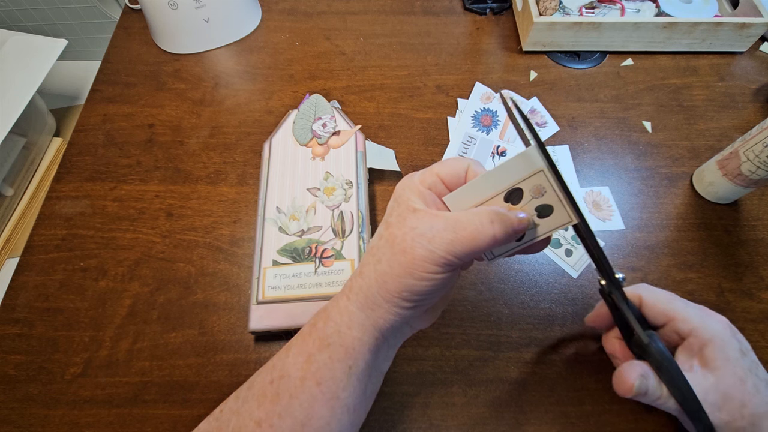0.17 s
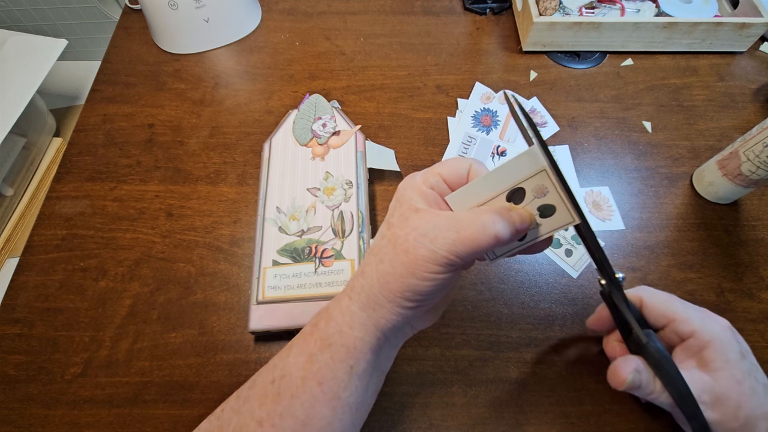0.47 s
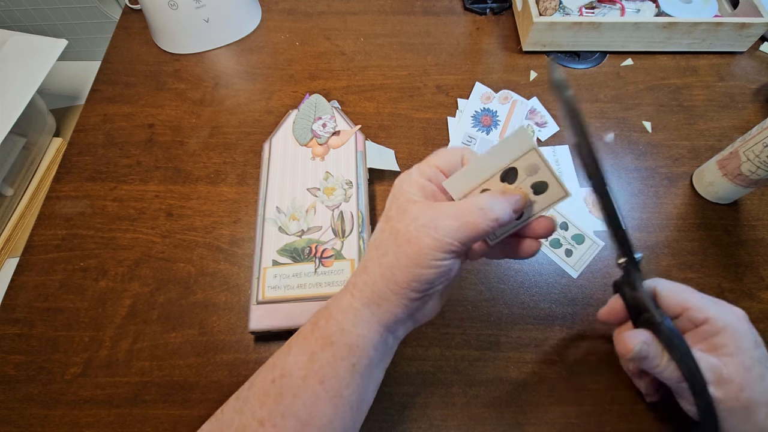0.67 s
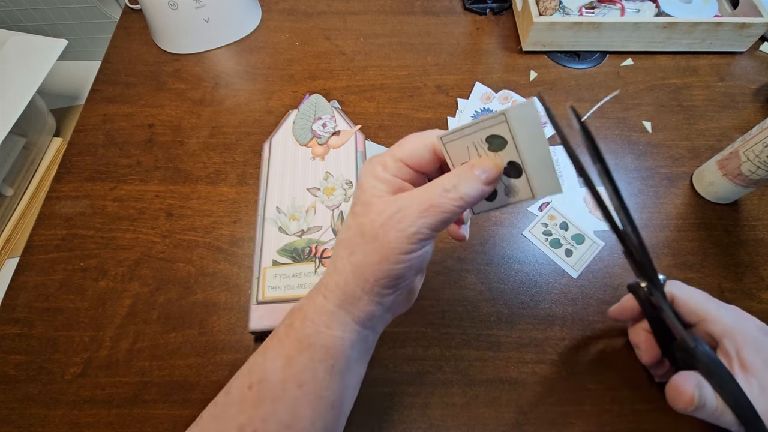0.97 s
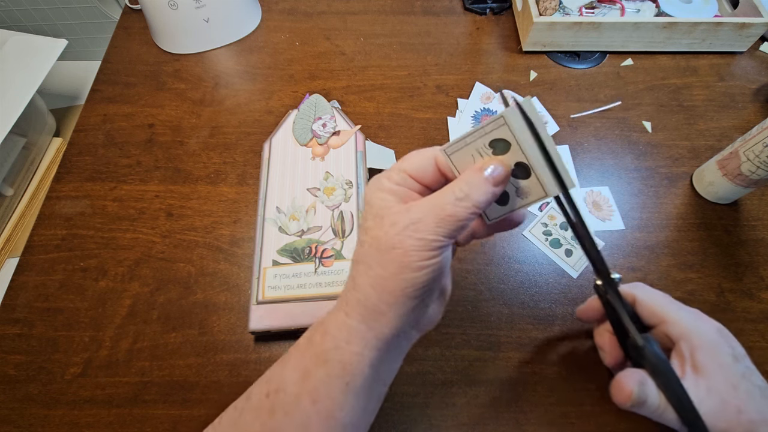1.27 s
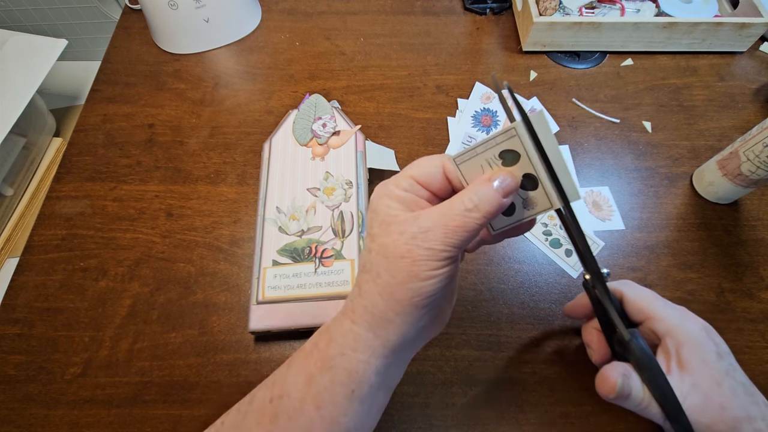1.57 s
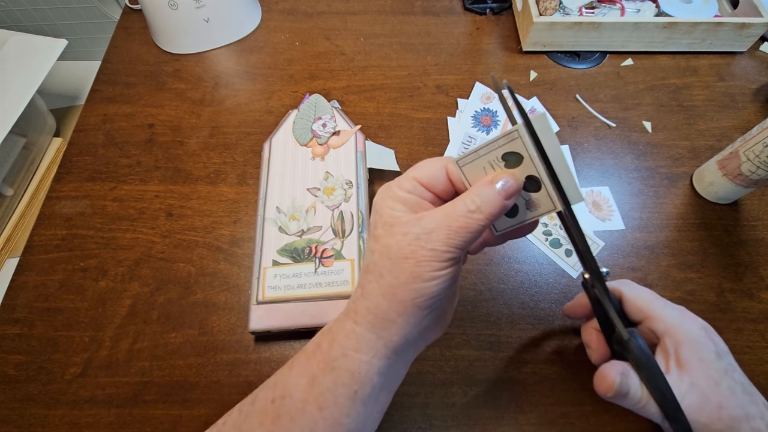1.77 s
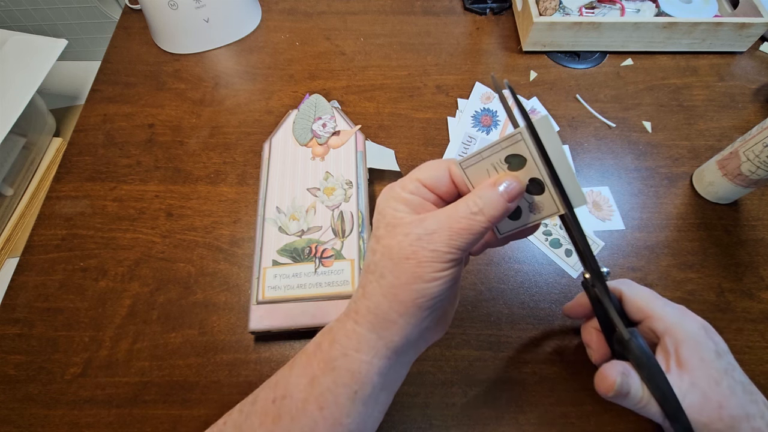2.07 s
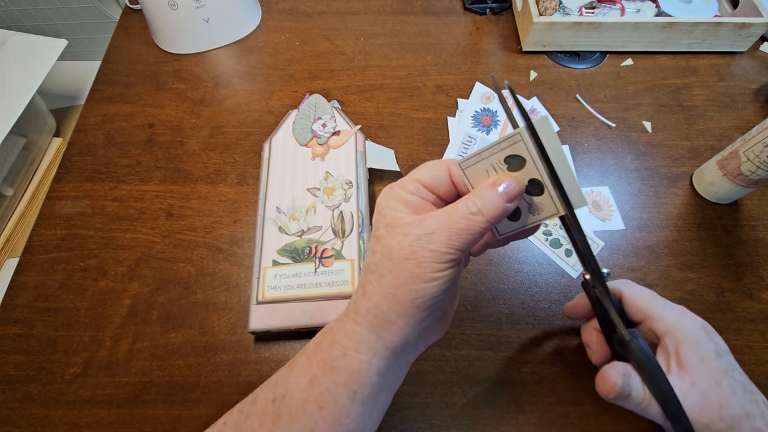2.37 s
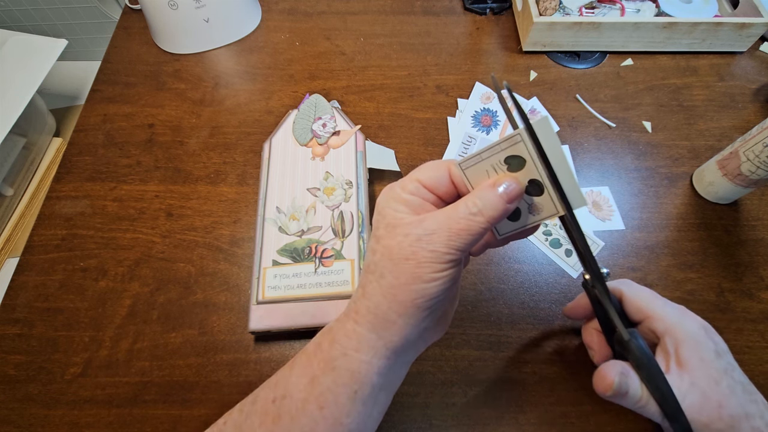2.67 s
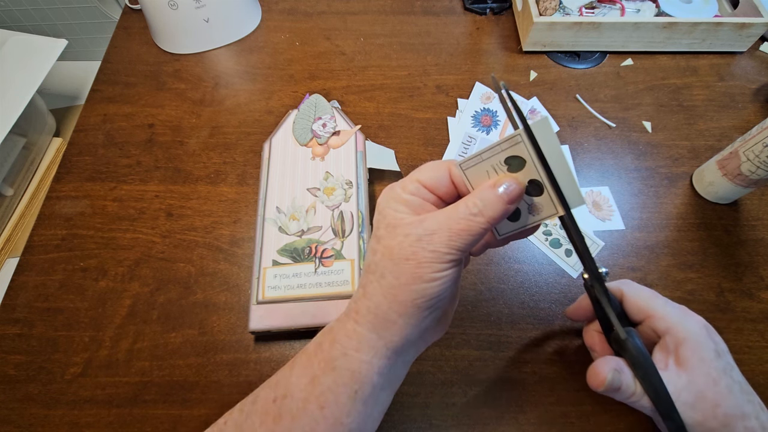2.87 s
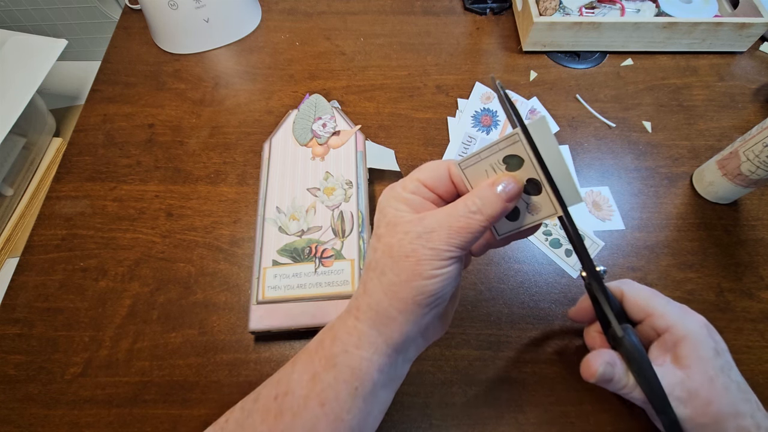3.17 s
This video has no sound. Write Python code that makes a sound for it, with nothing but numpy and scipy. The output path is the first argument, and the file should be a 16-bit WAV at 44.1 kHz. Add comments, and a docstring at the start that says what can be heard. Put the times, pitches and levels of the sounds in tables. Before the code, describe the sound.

Scissors cut card, close and slightly left in stereo, in a small quiet room with soft low rumble and faint hum. From 0 s dry crackling bites quicken and grow, loudest around 0.53-0.58 s, ending in a metallic snap. Blades rub open at 0.7-1.0 s, with a low thump at 0.81 and click at 0.85. Barely audible handling and ticks follow; from 2.8 s a slow, quieter cut crackles until the end.

```python
"""Scissors trimming card

Large scissors above a wooden desk in a quiet room, heard close and in stereo, a little to the left.
The blades bite through the fibres in crackling bursts that ring the card, quicken and grow until they snap shut.
They slide open with a grainy rub, a thump and a click while the card is turned; light handling and faint ticks
fill the pause, then a second, slow cut begins. Filtered noise and wavering sines make the room's rumble and hum."""
import sys
import numpy as np
from scipy import signal
from scipy.fft import rfft, irfft
from scipy.io import wavfile

SR = 44100
rng = np.random.default_rng(int(sys.argv[2]) if len(sys.argv) > 2 else 0)


def unload_audio(sound):
    """Save the sound as a 16-bit wav file, at the path given as the first command line argument."""
    columns = np.transpose(np.atleast_2d(sound))
    # keep every value between -1 and 1, then stretch to whole-number steps
    steps = np.round(np.clip(columns, -1, 1) * 32767)
    wavfile.write(sys.argv[1], SR, steps.astype(np.int16))


N = 145530
TIME = np.arange(N) / SR


def from_db(db):
    """Decibels to gain."""
    return 10 ** (np.asarray(db) / 20)


def rms_one(x):
    """Scale to unit rms."""
    return x / np.sqrt(np.mean(x ** 2) + 1e-20)


def colour(x, points, keep_level=True, size=8192):
    """Minimum-phase filter through (f/Hz, level/dB) points; by default white noise keeps its level."""
    hz, db = np.transpose(points)
    bin_hz = np.arange(size // 2 + 1) * SR / size
    gain = from_db(np.interp(np.log(bin_hz + 1), np.log(hz), db))
    # folding the cepstrum forward makes the filter causal
    cepstrum = irfft(np.log(rms_one(gain) if keep_level else gain))
    cepstrum[1:size // 2] *= 2
    cepstrum[size // 2 + 1:] = 0
    response = irfft(np.exp(rfft(cepstrum)))
    return signal.fftconvolve(np.atleast_2d(x), response[None], axes=1)[:, :N]


# stereo spread of the scissors, side relative to mid: f/Hz, level/dB
WIDTH = [(150, -13), (400, -15), (1000, -12.5), (2500, -7), (5000, -3), (9000, 1.5), (16000, -1)]


def stereo(pair, width=WIDTH):
    """Two unrelated signals become mid and side, with the side filtered by the width curve."""
    side = colour(pair[1], width, keep_level=False)[0]
    return np.array([pair[0] + side, pair[0] - side])


def stereo_noise(width=WIDTH):
    """White noise spread over the stereo pair."""
    return stereo(rng.standard_normal((2, N)), width)


def grains(per_s, spread_db):
    """Stereo stream of tiny clicks of uneven size and either sign, rms 1 before spreading."""
    uneven_db = spread_db * np.minimum(rng.exponential(1, (2, N)), 4)
    sizes = from_db(uneven_db) * rng.choice([-1, 1], (2, N))
    present = rng.random((2, N)) < per_s / SR
    return stereo(rms_one(sizes * present))


def ring(x, hz, t60):
    """A unit click sets a decaying sine ringing from height 1."""
    r, w = np.exp(-np.log(1000) / (t60 * SR)), 2 * np.pi * hz / SR
    return signal.lfilter([0, np.sin(w)], [1, -2 * r * np.cos(w), r * r], x + 1e-18)


def resonance(x, hz, width):
    """Band resonance with a gain of about 1 on top."""
    r = np.exp(-np.pi * width / SR)
    poles = [1, -2 * r * np.cos(2 * np.pi * hz / SR), r * r]
    return signal.lfilter(np.array([1, 0, -1]) * (1 - r * r) / 2, poles, x + 1e-18)


def wander(per_s):
    """Random values joined by straight lines, so many a second."""
    return np.interp(TIME * per_s, np.arange(N), rng.standard_normal(N))


# low room rumble, relative spectrum: f/Hz, level/dB
RUMBLE = [(15, -18), (30, -1.5), (45, -2), (62, 5.5), (78, -4.5), (98, -23), (160, -33), (400, -60.5),
          (2000, -100)]
# rumble level through the take: t/s, level/dB
RUMBLE_LEVEL = [(0, -42.5), (.35, -47), (.9, -46.5), (1.5, -42.5), (1.8, -45), (2.4, -41), (2.7, -42),
                (2.85, -48), (3.3, -46)]
# soft air of the room, relative spectrum: f/Hz, level/dB
AIR = [(40, 16), (100, 24.5), (150, 29.5), (205, 19), (300, 17.5), (450, 4.5), (800, -1.5), (1300, -2),
       (1900, -11.5), (3500, -16.5), (4500, -16), (6000, -26.5), (8700, -33), (9800, -59.5), (16000, -42)]
# mains hum and a thin whine: f/Hz, level/dB rms before wavering
HUM = [(119.6, -61.5), (176.2, -62.5), (2160, -84), (4430, -100.5)]
# stereo spread of the diffuse background, side relative to mid: f/Hz, level/dB
BACKGROUND_WIDTH = [(60, -31), (150, -11), (300, -8), (700, 1), (2000, 2.5), (8000, -2)]
AIR_DB, HUM_WAVER = -61, 0.2
RUMBLE_WANDER_DB, RUMBLE_WANDERS_PER_S = 2.5, 11


def background():
    """Low rumble and soft air as filtered noise, with hum as sines wavering slightly in level and phase."""
    rumble_db = np.interp(TIME, *np.transpose(RUMBLE_LEVEL))
    rumble_db = rumble_db + RUMBLE_WANDER_DB * wander(RUMBLE_WANDERS_PER_S)
    rumble = from_db(rumble_db) * colour(stereo_noise(BACKGROUND_WIDTH), RUMBLE)
    air = from_db(AIR_DB) * colour(stereo_noise(BACKGROUND_WIDTH), AIR)
    knots = np.linspace(0, TIME[-1], num=20)
    hum = 0
    for hz, db in HUM:
        wavers = HUM_WAVER * rng.standard_normal((2, len(knots)))
        swell, drift = (np.interp(TIME, knots, waver) for waver in wavers)
        sine = np.sin(2 * np.pi * hz * TIME + 2 * drift)
        hum = hum + from_db(db) * np.sqrt(2) * (1 + swell) * sine
    return rumble + air + hum


BITE_ATTACK_S, BITE_RELEASE_S = 0.0049, 0.00077
BITE_LEAD_S, BITE_LEAD_DB = 0.0023, -3


def bite_shape(t, length):
    """A faint scrape leads in; the bite swells, holds while the blade advances, and dies."""
    lead = from_db(BITE_LEAD_DB) * np.exp(np.minimum(t, 0) / BITE_LEAD_S)
    swell = np.clip(t / BITE_ATTACK_S + 0.033, 0, 1)
    return np.maximum(lead, swell) * np.exp(-np.maximum(t - length, 0) / BITE_RELEASE_S)


# each bite of the blades: t/s, length/s, fibre crackle level/dB, extra treble level/dB,
# card ring level/dB, card pitch f/Hz, rasp pitch f/Hz
BITES = [ (.000, 0.01, -69, 4, -67, 368, 4060), (0.015, 0.0077, -62, -1.5, -69.5, 402, 4100),
         (.073, 0.0071, -52.5, -2, -65, 1010, 4380), (0.139, 0.00088, -63, 3.5, -78, 430, 4370),
         (0.151, .012, -59, -0.5, -64, 360, 4230), (.226, 0.0074, -43, -9.5, -63, 707, 4330),
         (0.256, 0.004, -59, 7.5, -63.5, 387, 4500), (0.288, 0.0087, -45.5, -8, -66, 430, 5630),
         (.408, 0.0065, -53, -4.5, -65, 406, 5170), (0.416, 0.0093, -49.5, -9.5, -65, 390, 4840),
         (0.434, 0.0059, -52, -8, -69, 1100, 4100), (0.457, 0.01, -53.5, 0.5, -57.5, 722, 4830),
         (.492, 0.0096, -50, -5, -50, 775, 5330), (.525, 0.011, -37, -9, -52, 994, 1630),
         (.544, 0.011, -35, -12.5, -56, 734, 1620), (0.565, 0.0094, -38, -7.5, -66, 1020, 2100),
         (0.58, 0.0061, -53, 2, -49, 1004, 4430), (0.591, 0.016, -49, -1.5, -87, 990, 2840),
         (2.8, 0.0039, -61.5, -6.5, -85, 326, 2930), (2.828, 0.0036, -57, -0.5, -83, 330, 2970),
         (2.854, 0.012, -62, -2, -72, 360, 4740), (2.893, 0.0055, -72, 1, -77, 345, 4400),
         (2.913, 0.011, -63.5, 7, -62.5, 399, 3140), (2.947, 0.0099, -68, 8, -70, 366, 5160),
         (2.979, 0.007, -62, 5.5, -66, 403, 5150), (3.007, 0.0093, -62.5, 2.5, -90, 430, 2750),
         (3.061, 0.005, -66, 9.5, -71.5, 336, 4970), (3.082, 0.016, -56.5, -1.5, -67.5, 303, 5030),
         (3.137, 0.0036, -65, 2, -81, 360, 3970), (3.163, 0.005, -69, 4, -85, 366, 4870),
         (3.179, 0.002, -63, 5, -87, 367, 4800), (3.192, 0.0058, -55.5, -4.5, -74, 385, 4850),
         (3.218, 0.0085, -56.5, -5, -88, 400, 3800), (3.238, 0.0041, -53, -6, -71, 415, 3600),
         (3.247, 0.0058, -52.5, -1, -70, 400, 3530), (3.28, 0.014, -53, -6.5, -65, 364, 4100)]


def bite_envelope(levels_db):
    """All bites in turn, at the given levels."""
    out = np.zeros(N)
    for (start, length, *_), db in zip(BITES, levels_db):
        span = slice(max(int(start * SR) - SR // 20, 0), int(start * SR) + SR // 10)
        out[span] += from_db(db) * bite_shape(TIME[span] - start, length)
    return out


RASP_WIDTH_HZ, RASP_DB = 240, 5.5


def rasps(crackle):
    """Each bite brings out its own narrow band of the crackle."""
    out = np.zeros((2, N))
    for start, length, *_, rasp_hz in BITES:
        end = start + length + 4 * BITE_RELEASE_S
        span = slice(max(int(start * SR), 0), int(end * SR))
        out[:, span] += resonance(crackle[:, span], rasp_hz, RASP_WIDTH_HZ)
    return from_db(RASP_DB) * out


# the card as a sounding board: f/multiple of the bite's card pitch, level/dB relative to its ring
CARD = [(0.998, 0), (1.17, -14.5), (1.58, -18.5), (2.02, -15.5), (2.701, -17)]
CARD_Q, CARD_RING_S = 12, .04


def card_rings(fibres):
    """Each bite shakes the card, which rings at the pitch of the strip still held."""
    out = np.zeros((2, N))
    for start, length, _, _, card_db, pitch, _ in BITES:
        span = slice(max(int(start * SR), 0), int((start + CARD_RING_S) * SR))
        push = fibres[:, span] * bite_shape(TIME[span] - start, length)
        for ratio, db in CARD:
            hz = ratio * pitch
            out[:, span] += from_db(card_db + db) * rms_one(resonance(push, hz, hz / CARD_Q))
    return out


# breaking fibres, relative spectrum: f/Hz, level/dB
CRACKLE = [(250, -8.5), (400, -5), (600, 0.5), (800, -6.5), (1400, -5), (2200, -3.5), (2950, 1),
           (4100, 1.5), (5100, 3.5), (6300, -0.5), (8600, 3), (9900, -17.5), (12000, -1.5), (16000, -12.5)]
FIBRES_PER_S, FIBRE_SPREAD_DB = 7000, 3
TREBLE_FROM_HZ = 1970


def cutting():
    """Fibres break in bursts; they crackle, rasp and set the card ringing."""
    _, _, crackle_db, treble_db, *_ = np.transpose(BITES)
    fibres = grains(FIBRES_PER_S, FIBRE_SPREAD_DB)

    def band(kind):
        """One side of the treble split, filtered twice so that the bands rejoin evenly."""
        sections = signal.butter(2, TREBLE_FROM_HZ, kind, fs=SR, output="sos")
        return signal.sosfilt(sections.repeat(2, axis=0), fibres)

    low = band("low") * bite_envelope(crackle_db)
    high = band("high") * bite_envelope(crackle_db + treble_db)
    crackle = colour(low + high, CRACKLE)
    return crackle + rasps(crackle) + card_rings(fibres)


# the blades knock together: t/s, level/dB before colouring, rattle decay/s
KNOCKS = [(.582, -29, 0.0025), (0.5865, -40, 0.0051), (0.809, -48, 0.0073), (0.8525, -42, 0.0062)]
# click and rattle, relative spectrum: f/Hz, level/dB
KNOCK = [(120, -21.5), (260, 9.5), (380, -3), (520, -2), (1000, 2.5), (1400, -8.5), (2000, -4), (2800, 0.5),
         (4500, 0), (6300, -10.5), (8600, -16), (10000, -21.5), (12500, -12), (16000, -19.5)]
# modes of the steel blades: f/Hz, relative level/dB
BLADES = [(2434, -1.5), (2952, 0), (3530, -11), (4408, -3), (4485, 8), (4770, -3), (5069, -3.5),
          (5640, -1.5)]
KNOCK_CLICK_DB = -4
BLADES_DB, BLADES_T60_S = -22.5, .1


def knocks():
    """A sharp click, a brief noisy rattle and a short ring of steel, damped by the hand."""
    envelope, clicks = np.zeros((2, N))
    for s, knock_db, decay_s in KNOCKS:
        envelope += from_db(knock_db) * (TIME >= s) * np.exp(-np.abs(TIME - s) / decay_s)
        clicks[int(s * SR)] = from_db(knock_db)
    steel = 0
    for k, (hz, db) in enumerate(BLADES):
        steel = steel + (-1) ** k * from_db(BLADES_DB + db) * ring(clicks, hz, BLADES_T60_S)
    rattle = stereo_noise() * envelope
    return colour(from_db(KNOCK_CLICK_DB) * clicks + rattle, KNOCK) + steel


# rubbing as the blades open and the card is turned: t/s, level/dB before catching
SLIDE = [(.699, -60), (0.706, -61.5), (0.731, -65), (0.75, -47), (.76, -59.5), (.81, -54), (.845, -56.5),
         (0.871, -64), (0.894, -66), (.938, -57), (.955, -62), (.975, -67.5), (1.01, -76), (1.051, -79),
         (1.1, -100)]
# that rubbing, relative spectrum: f/Hz, level/dB
RUB = [(250, -0.5), (600, -2.5), (1400, -5), (2200, 1), (3200, 1.5), (5500, 0.5), (8300, 2.5), (10000, -7),
       (12500, -3), (16000, -6.5)]
# light rubbing of card and fingers in the pause, then a faint rub of the blades beneath the second cut's bites:
# t/s, level/dB before catching
LIGHT_RUB = [(1.05, -88.5), (1.25, -90.5), (1.35, -104), (1.62, -100), (1.655, -80.5), (1.69, -104.5),
             (1.76, -86.5), (1.82, -102), (2.0, -100), (2.03, -93.5), (2.07, -102), (2.76, -100),
             (2.79, -77.5), (2.9, -80.5), (3.3, -74.5)]
# that light rubbing, relative spectrum: f/Hz, level/dB
LIGHT_RUB_SPECTRUM = [(400, -1.5), (1500, -3), (2900, 2), (5000, -3), (7000, -12), (8700, 2.5), (10000, -26),
                      (12000, -14.5), (16000, -37)]
RUB_GRAINS_PER_S, RUB_SPREAD_DB = 15000, 1.5
RUB_CATCHES_PER_S, RUB_CATCH_DB = 170, 2.8


def rubbing(curve, spectrum):
    """Fine-grained friction that follows a level curve, catching and slipping unevenly."""
    s, db = np.transpose(curve)
    level_db = np.interp(TIME, s, db, left=-140, right=-140)
    level = from_db(level_db + RUB_CATCH_DB * wander(RUB_CATCHES_PER_S))
    return colour(grains(RUB_GRAINS_PER_S, RUB_SPREAD_DB) * level, spectrum)


# low modes of the thump: f/Hz, level/dB, T60/s
THUMP = [(54.2, -31, 0.2), (87, -35, 0.088), (115.4, -27.5, 0.094), (169.7, -30, 0.14), (234, -38, 0.071),
         (343, -47, 0.085), (504, -48, 0.13), (650, -46, 0.09), (1040, -43, .04)]
THUMP_S, THUMP_PUSH_S = .8068, 0.0013


def thump():
    """A soft push into mostly low modes, which swing in turn with and against it."""
    push = np.sin(np.pi * np.clip((TIME - THUMP_S) / THUMP_PUSH_S, 0, 1)) ** 2
    push = push / push.sum()
    return sum((-1) ** k * from_db(db) * ring(push, hz, t60) for k, (hz, db, t60) in enumerate(THUMP))


# faint high ticks in the pause: t/s, level/dB
TICKS = [(1.779, -80.5), (2.69, -72)]
# tick hiss, relative spectrum: f/Hz, level/dB
TICK = [(300, -39.5), (7000, -14.5), (9500, -12), (13500, 2.5), (16000, -3)]
TICK_WIDTH_S = 0.011  # standard deviation of the bell-shaped swell


def ticks():
    """Tiny puffs of high hiss."""
    level = sum(from_db(db) * np.exp(-((TIME - s) / TICK_WIDTH_S) ** 2 / 2) for s, db in TICKS)
    return colour(stereo_noise() * level, TICK)


DESK_DB, DESK_T60_S, DESK_ABOVE_HZ = -9, 0.076, 1860
ROOM_DB, ROOM_T60_S, ROOM_BUILD_S = -9, 0.17, 0.0068


def room(x):
    """Direct sound, quick bright reflections from the desk and a short room tail."""
    t = TIME[:SR // 2]
    desk = rng.standard_normal((2, len(t))) * np.exp(-np.log(1000) * t / DESK_T60_S)
    highpass = signal.butter(1, DESK_ABOVE_HZ, "high", fs=SR, output="sos")
    desk = rms_one(signal.sosfilt(highpass, desk))
    tail = stereo_noise()[:, :len(t)]
    tail = rms_one(tail * np.exp(-np.log(1000) * t / ROOM_T60_S) * (1 - np.exp(-t / ROOM_BUILD_S)))
    response = (from_db(DESK_DB) * desk + from_db(ROOM_DB) * tail) / np.sqrt(len(t))
    return x + signal.fftconvolve(x, response, axes=1)[:, :N]


# lean of the scissors across the stereo pair, left relative to right: f/Hz, level/dB
LEAN = [(100, 9), (700, 1), (1300, -1), (2400, 0.5), (4400, 0.5), (8200, 4.5), (12000, 1.5), (16000, -3)]


def lean(x):
    """Tilt the pair by frequency, half the difference on each side."""
    left = [(hz, db / 2) for hz, db in LEAN]
    right = [(hz, -db / 2) for hz, db in LEAN]
    return np.vstack([colour(channel, curve, keep_level=False) for channel, curve in zip(x, (left, right))])


def scene():
    """Scissors and card, a little to the left, over the room's background."""
    scissors = cutting() + knocks() + rubbing(SLIDE, RUB) + rubbing(LIGHT_RUB, LIGHT_RUB_SPECTRUM)
    return lean(room(scissors)) + thump() + ticks() + background()


CUTOFF_HZ = 15850


def record(dry):
    """The top is cut steeply."""
    return signal.sosfilt(signal.ellip(12, .2, 80, CUTOFF_HZ, fs=SR, output="sos"), dry)


dry = scene()
out = record(dry)
unload_audio(out)
```